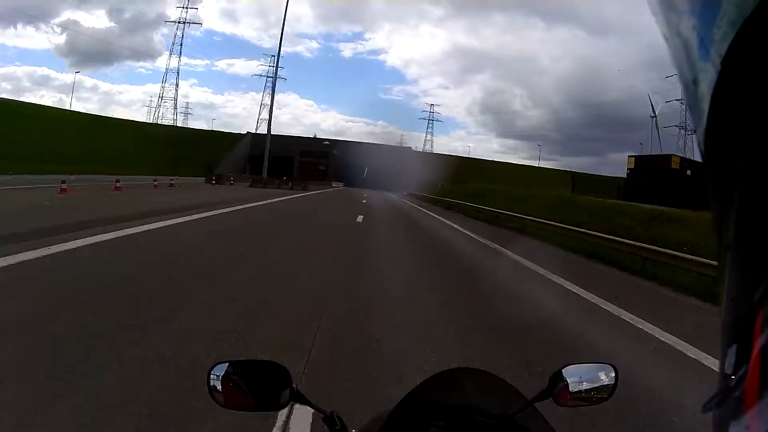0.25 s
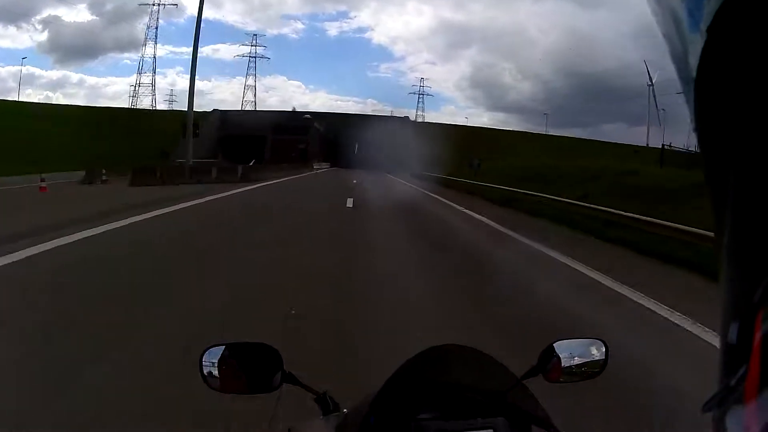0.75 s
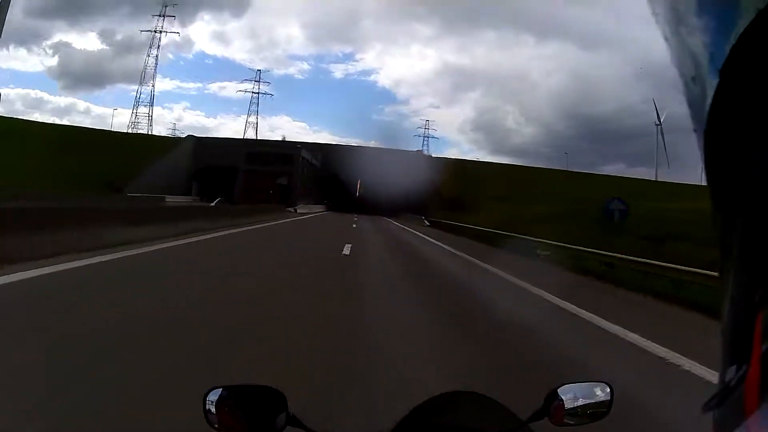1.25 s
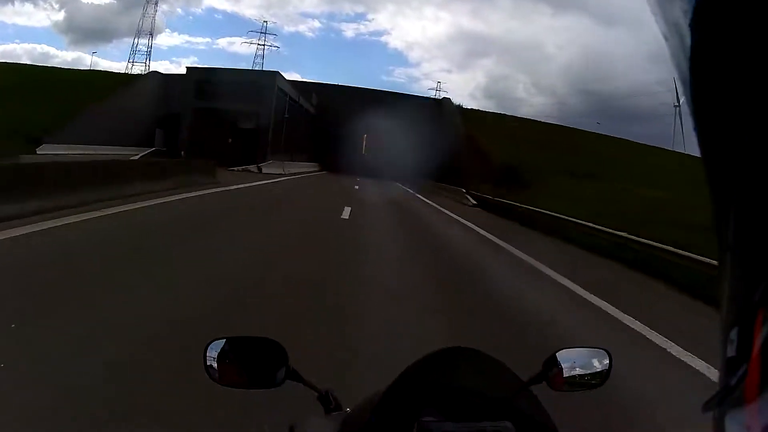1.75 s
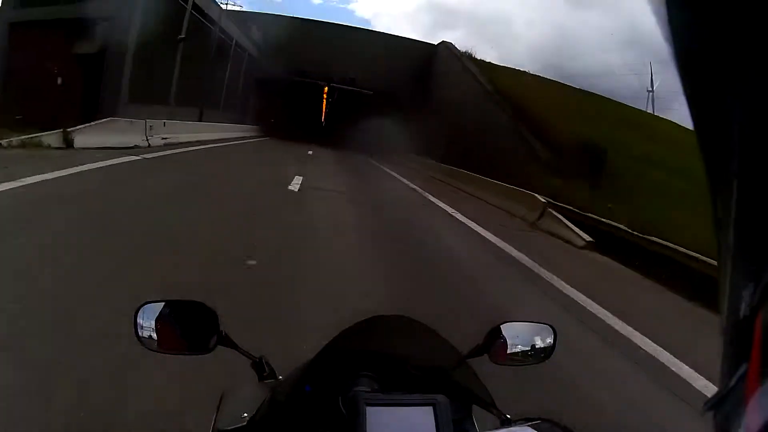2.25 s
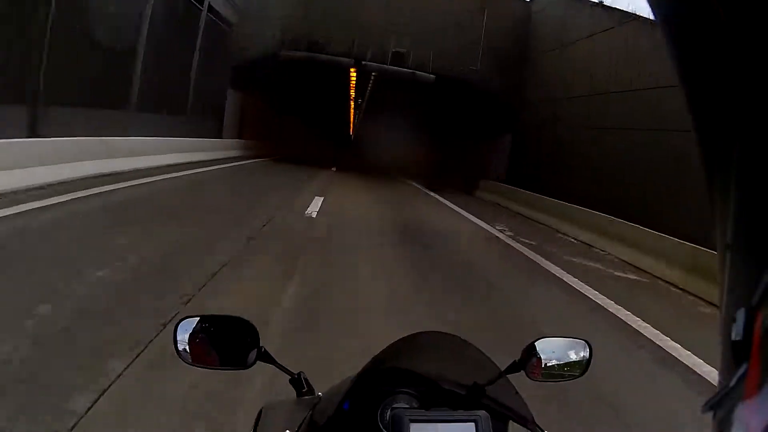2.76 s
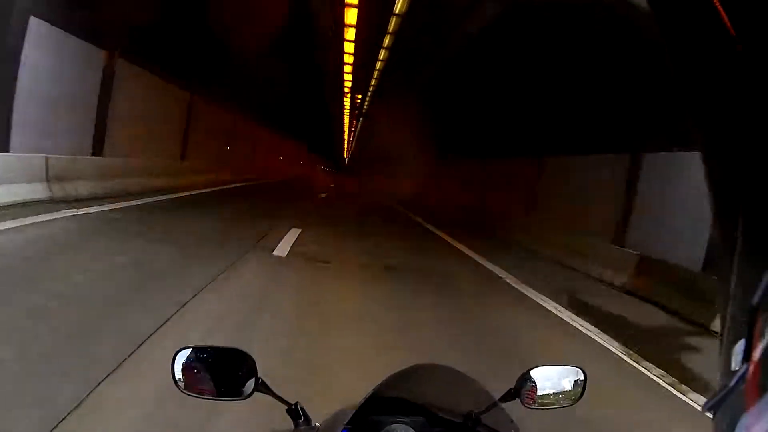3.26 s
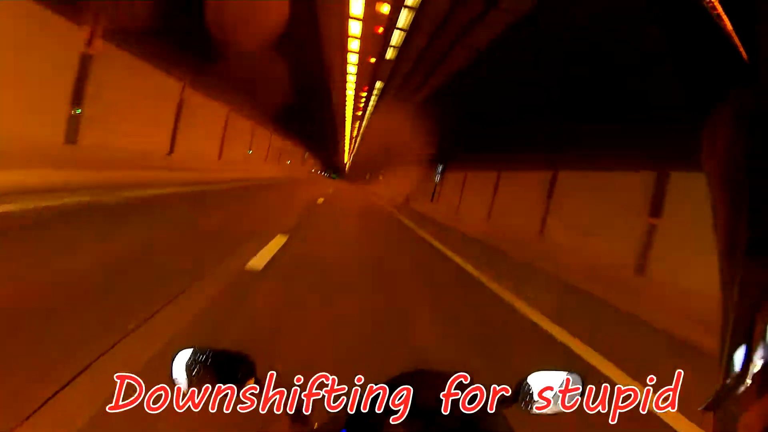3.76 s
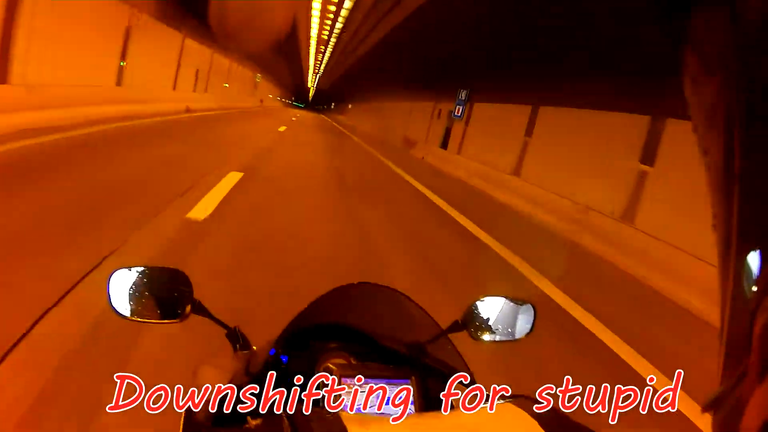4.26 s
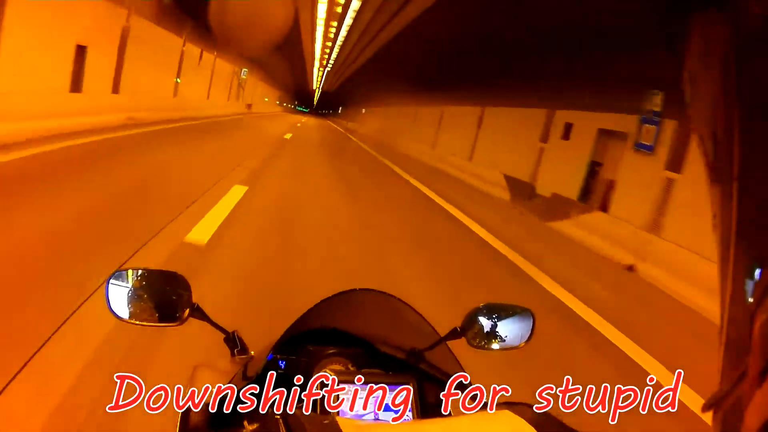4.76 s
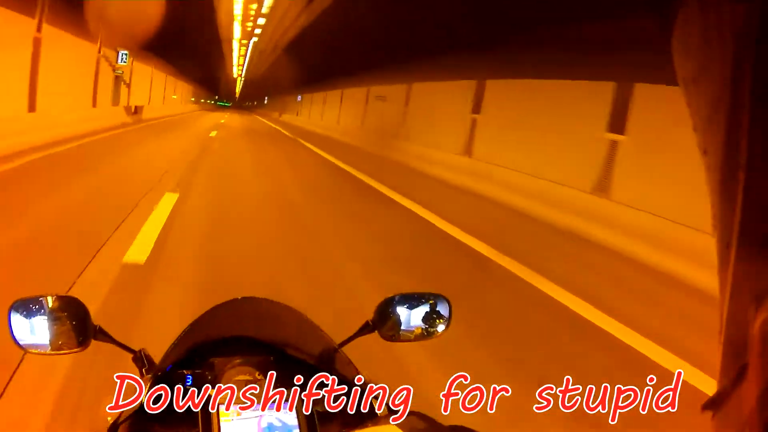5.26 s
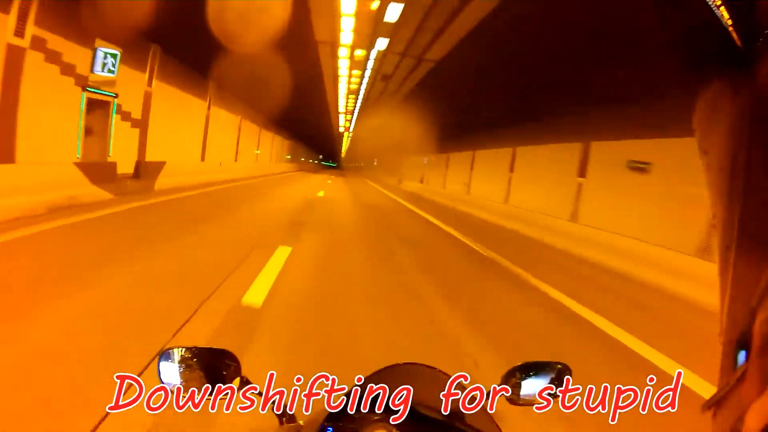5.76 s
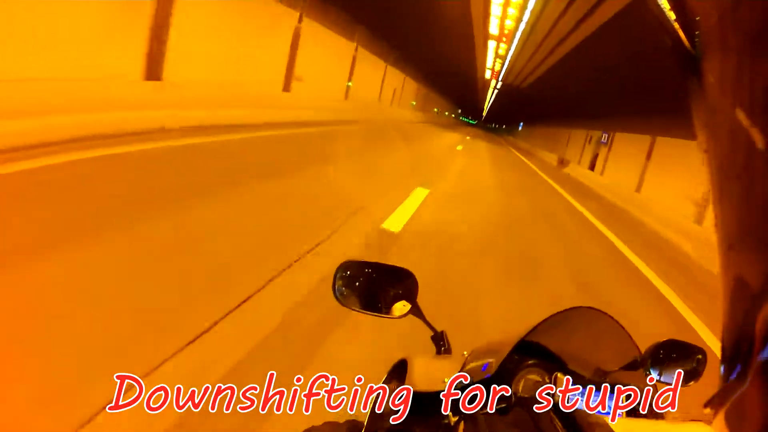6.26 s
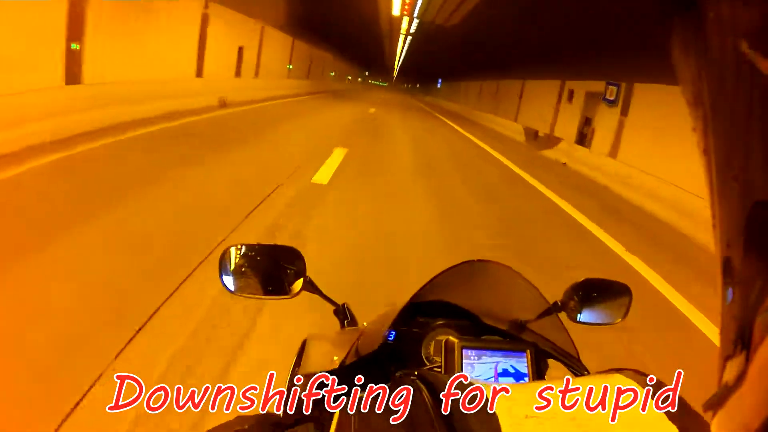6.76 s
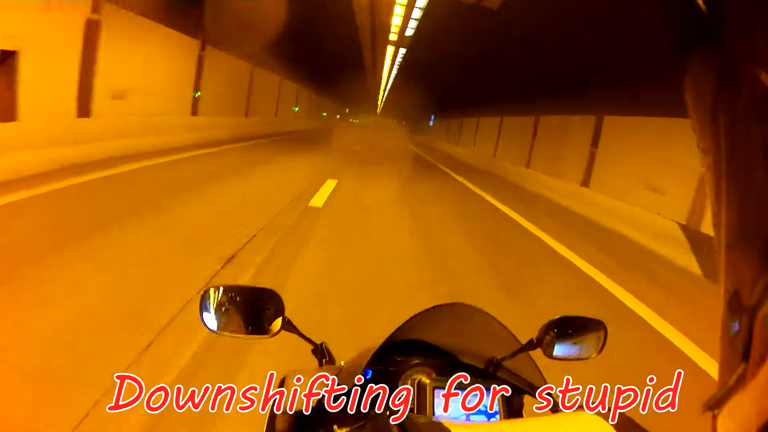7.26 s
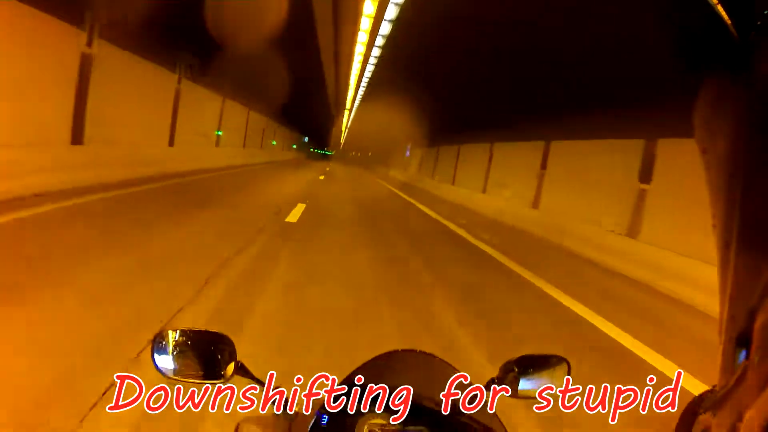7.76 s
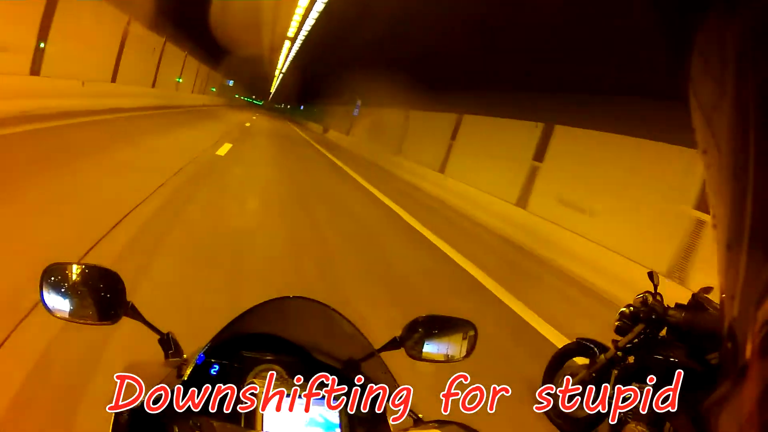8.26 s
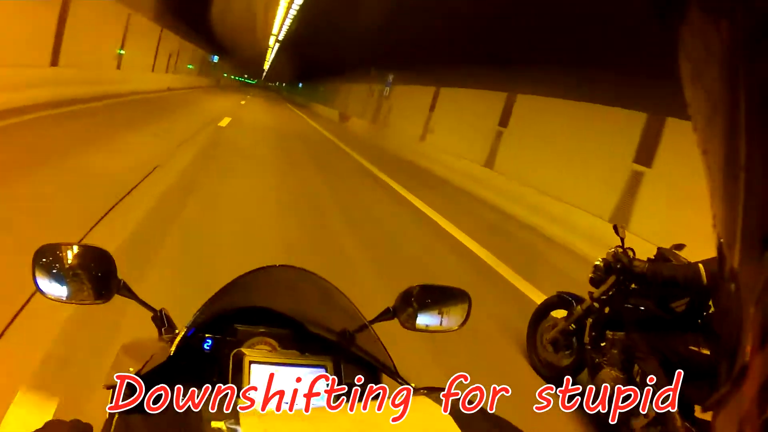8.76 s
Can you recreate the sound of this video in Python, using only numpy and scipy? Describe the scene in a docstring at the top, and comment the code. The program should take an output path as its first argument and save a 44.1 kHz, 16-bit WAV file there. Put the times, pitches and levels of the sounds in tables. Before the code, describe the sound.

From a rider's helmet, heavy gusting wind roars and buffets, stronger in bass on the left, with thumps and dry plastic ticks. Entering a concrete tunnel, the four-cylinder exhaust emerges as a smooth, echoing boom, swelling and fading. It steps higher with a downshift, sags, then steps up again after two short coughs and brief gear whine. A second motorcycle's rough drone draws alongside at the end.

```python
"""A four-cylinder sport motorcycle rides into a road tunnel, heard from the rider's helmet in a roaring airstream.
Its exhaust is a sine at the firing rate with weak overtones and noise puffs; it booms and steps up with two
downshifts, and the pipe coughs twice before the second. Valve clatter and gear whine come from the same bike.
The wind is four bands of gusting noise, with thumps, short flecks of noise and dry ticks of the helmet mount.
A second motorcycle, with its own ragged exhaust note, draws alongside at the end."""
import sys
import numpy as np
from scipy import signal
from scipy.fft import rfft, irfft, next_fast_len
from scipy.io import wavfile
from scipy.ndimage import uniform_filter1d, map_coordinates

SR = 44100
rng = np.random.default_rng(int(sys.argv[2]) if len(sys.argv) > 2 else 0)


def master(y):
    """Save y as 16-bit WAV."""
    cut = np.clip(np.atleast_2d(y).T, -1, 1)
    pcm = np.round(cut * 32767)  # scale
    wavfile.write(sys.argv[1], SR, pcm.astype(np.int16))


N = 397605  # length in samples, about 9 s

# In every table, a positive left-right difference means the left is louder.


def amp(db):
    """Turn decibels into gain."""
    return 10 ** (np.asarray(db) / 20)


def unit(x):
    """Scale to rms 1."""
    return x / np.sqrt(np.mean(x ** 2) + 1e-20)


def along(points, hz):
    """Read a curve of (Hz, value) points on a log frequency axis."""
    f, v = np.transpose(points)
    return np.interp(np.log(hz + 1), np.log(f + 1), v)


def curves(rows):
    """Give one value per sample for each column after the time."""
    s, *cols = np.transpose(rows)
    return [np.interp(np.arange(N) / SR, s, c) for c in cols]


def wobble(rate):
    """Draw a smooth random curve through `rate` random points a second."""
    knots = rng.standard_normal(int(N * rate / SR) + 4)
    return map_coordinates(knots, [np.arange(N) * rate / SR])


def swells(rows):
    """Add up flat-topped swells in dB, one for each (centre, length, dB) row."""
    t = np.arange(N) / SR
    return sum(db * np.exp(-(2 * (t - s) / length) ** 4) for s, length, db in rows)


def bump(centre, half_width):
    """A smooth bell-shaped bump in time; both values in seconds."""
    t = np.arange(N) / SR
    return np.exp(-((t - centre) / half_width) ** 2)


def filtered(x, response):
    """Multiply the spectrum of x by a response of frequency."""
    m = next_fast_len(N + SR // 2)
    return irfft(rfft(x, m) * response(np.fft.rfftfreq(m, 1 / SR)), m)[..., :N]


def panned(side_db):
    """Left and right gains that differ by side_db but keep the power constant."""
    g = amp(np.array([side_db, -side_db]).reshape(2, -1) / 2)
    return g / np.sqrt(np.mean(g ** 2, axis=0))


def colour(points, hz):
    """Gain of a spectrum that falls away steeply beyond its last point."""
    return amp(along(points, hz)) / (1 + (hz / (2 * points[-1][0])) ** 4)


# How alike the wind is at the two ears. Each row: frequency in Hz, likeness from 0 to 1.
ALIKE = [(40, 0.61), (120, 0.63), (175, 0.12), (260, 0.43), (400, 0.28), (630, 0.46), (850, 0.43),
         (1150, 0.74), (1800, 0.79), (2720, 0.87), (5000, .4), (9000, .05)]
# Which ear gets more wind. Each row: frequency in Hz, left-right difference in dB.
WIND_SIDE = [(30, 15.5), (70, 0.5), (140, -3.5), (250, -1.5), (620, -5), (1100, 0), (2000, -1.5),
             (2800, -5), (4000, -3.5), (7000, -6)]
# How far the left ear leads. Each row: frequency in Hz, lead in radians.
WIND_LEAD = [(30, 0.82), (100, 1.32), (260, 1.76), (600, 0.83), (1030, -0.47), (2000, -0.34), (3000, 1.1),
             (6000, -0.15)]


def airflow(spectrum, patchy_db):
    """Turbulent stereo noise of rms 1: patches of random gain in time and pitch, partly alike at the two ears."""
    z = signal.stft(rng.standard_normal((2, N)), nperseg=512)[2]
    field = uniform_filter1d(rng.standard_normal(z.shape[1:]), size=7, axis=0)
    field = uniform_filter1d(field, size=9, axis=1)
    pair = signal.istft(z * amp(patchy_db * unit(field)), nperseg=512)[1][:, :N]

    def mix(hz):
        # more shared "mid" than opposed "side" where the ears are alike
        angle = np.arccos(np.clip(along(ALIKE, hz), -1, 1)) / 2
        return colour(spectrum, hz) * [np.cos(angle), np.sin(angle)]

    def ears(hz):
        lead = np.exp(.5j * np.outer([1, -1], along(WIND_LEAD, hz)))
        return panned(along(WIND_SIDE, hz)) * lead

    mid, side = filtered(pair, mix)
    return unit(filtered(np.array([mid + side, mid - side]), ears))


# How long the tunnel rings. Each row: frequency in Hz, seconds to die away by 60 dB.
TUNNEL = [(100, 1.1), (500, 0.55), (2000, 0.87), (8000, 1.37)]


def tunnel(x):
    """Long concrete echo of decaying noise, renewed every quarter second as the walls fly past."""
    out = np.zeros((2, N + 2 * SR))
    hop = SR // 4
    padded = np.pad(x, (hop, 2 * hop))
    for start in range(0, N + hop, hop):
        hz, t, z = signal.stft(rng.standard_normal((2, SR)), SR, nperseg=256)
        decay = amp(-60 * t / along(TUNNEL, hz)[:, None])
        tail = signal.istft(z * decay, SR, nperseg=256)[1]
        piece = padded[start:start + 2 * hop] * signal.windows.cosine(2 * hop)
        echo = signal.fftconvolve(piece[None], tail / np.linalg.norm(tail[0]), axes=1)
        out[:, start:start + echo.shape[1]] += echo
    return out[:, hop:hop + N]


def crank(firing_hz, jitter):
    """Phase in radians of an engine or gear that turns slightly unevenly."""
    return 2 * np.pi * np.cumsum(firing_hz * (1 + jitter * wobble(70))) / SR


def exhaust(phase, orders, rough_db):
    """Sines at multiples of the basic rate, each fluttering at random in level."""
    out = np.zeros(N)
    for k, db in orders:
        level = amp(db + rough_db * wobble(35))
        out += level * np.sin(k * phase + rng.uniform(0, 2 * np.pi))
    return out


# Throttle and gear changes. Each row: start in seconds, glide in seconds, firing rate reached in Hz.
REV_CHANGES = [(3.199, 0.35, 214.3), (4.58, 0.12, 200.5), (4.77, .15, 232.2), (7.08, .16, 175.9),
               (7.43, .37, 216.3), (7.8, 0.1494, 240.9)]
CRUISE_HZ = 181.4  # firing rate on the open road
SAG_HZ_PER_S = 10  # engine braking after each change


def revs():
    """Firing rate in Hz: each change glides to a new speed, then the engine brakes steadily."""
    t = np.arange(N) / SR
    firing_hz = np.full(N, float(CRUISE_HZ))
    for s, glide, reached_hz in REV_CHANGES:
        coasting = reached_hz - SAG_HZ_PER_S * np.maximum(t - s - glide, 0)
        firing_hz = firing_hz + np.clip((t - s) / glide, 0, 1) * (coasting - firing_hz)
    return firing_hz


# Strength of the airstream, easing and recovering. Each row: time in seconds, strength in dB (scaled per layer).
AIRSTREAM = [(0, 0), (2.6, 0), (3.42, -2), (3.6, -1.5), (4.7, -1), (5.15, -3.5), (5.7, -2), (6.3, -2),
             (6.75, -6), (6.98, -6.5), (7.12, -3.5), (7.7, -3.5), (7.85, -5.5), (8.25, -5), (8.6, -3.5),
             (9.02, -1.5)]
# Gusts strike the left side. Each row: centre in seconds, length in seconds, strength in dB (scaled per layer).
GUSTS = [(.05, 0.049, 4), (.28, 0.059, 1), (.62, 0.04, 0.5), (.86, 0.059, 1), (.97, 0.12, 1),
         (1.9, 0.11, 0.5), (2.3, 0.051, 5.5), (2.7, 0.041, 4.5), (3.2, 0.1, 4), (3.34, 0.095, 1.5),
         (3.65, 0.26, 5), (4.09, 0.056, 2.5), (5.73, 0.12, 2.5), (6.11, 0.057, 1), (7.2, 0.25, 3),
         (8.58, 0.078, 4.5)]
# The left side of the helmet falls into the lee of the screen.
# Each row: centre in seconds, length in seconds, depth in dB (scaled per layer).
LULLS = [(.14, 0.077, 4), (.42, 0.1, 9.5), (.79, 0.057, 5), (1.05, 0.066, 3), (1.38, 0.056, 2.5),
         (1.68, 0.047, 6.5), (2.025, 0.067, 11), (2.57, 0.11, 7.5), (2.78, 0.13, 3.5), (3.07, .11, 7.5),
         (3.27, 0.033, 3), (3.44, 0.11, 11.5), (3.81, 0.089, 3.5), (4.16, 0.038, 3.5), (5.09, 0.063, 9),
         (5.85, 0.053, 4.5), (5.96, 0.054, 2.5), (6.68, 0.022, 8), (6.74, 0.023, 9), (6.97, 0.054, 3.5),
         (7.41, .04, 0.5), (7.8, .11, 17), (8.07, 0.1, 1.5)]
CHOP_DB, CHOPS_PER_S = 0.9, 16  # smaller random gusts on top (dB scaled per layer)
# Basic level of the bass buffeting, before gusts and airstream. Each row: time in seconds, level in dB.
BUFFET_LEVEL = [(0, -20), (2.5, -21.5), (3.2, -22), (4.7, -21), (5.6, -20.5), (6.8, -21), (7.5, -21),
                (8.4, -21.5), (8.75, -26.5), (9.02, -29)]
# The buffeting stalls for a moment; the roar dips less.
# Each row: centre in seconds, length in seconds, depth in dB (negative is a rise).
STALLS = [(.53, .05, 4), (1.77, 0.041, 6), (2.22, 0.074, 6), (2.36, .04, 10), (2.53, 0.029, -1),
          (2.76, .06, 2), (3.33, 0.03, 5)]
# Tone of the four wind layers, from bass to treble. Each row: frequency in Hz, strength in dB.
BUFFET = [(12, -30), (20, -10), (38, -5.5), (135, 0), (173, -4.5), (189, -0.5), (220, -12.5), (290, -34),
          (480, -120)]
ROAR = [(90, -12.5), (140, -7), (180, 0), (230, -1.5), (310, -4), (430, -8.5), (540, -10), (650, -8.5),
        (740, -14), (1000, -19.5), (1400, -31), (2500, -55)]
RUSH = [(600, -12.5), (1000, 2), (1400, 2), (1950, -0.5), (2400, -4.5), (3000, -10.5), (3700, -17),
        (4900, -17.5), (5800, -26), (7500, -32.5), (10000, -43), (14000, -71.5)]
EDGE = [(2000, -35), (3500, 4), (5000, 1.5), (6000, 0.5), (7200, 2), (8600, -4.5), (9800, -5),
        (12500, -11.5), (14000, -23), (15000, -36.5)]
# Basic level in dB, left-right difference in dB, dB gained per dB of airstream
ROAR_DB, ROAR_SIDE_DB, ROAR_GROWS = -19, -2, 1.25
RUSH_DB, RUSH_SIDE_DB, RUSH_GROWS = -31.5, -0.5, 0.95
HISS_DB, HISS_SIDE_DB, HISS_GROWS = -46, 22, 1.53  # air tearing off the visor's left edge
BUFFET_SIDE_DB, BUFFET_GROWS = 5.5, 0.68  # buffeting gains from gusts by the same factor


def wind():
    """One airstream drives buffeting, roar, rush and visor hiss; gusts and lulls reach mainly the left ear."""
    air_db, = curves(AIRSTREAM)
    gust_db = np.outer([1, .12], swells(GUSTS) - swells(LULLS) + CHOP_DB * wobble(CHOPS_PER_S))
    buffet_db, = curves(BUFFET_LEVEL)
    eddies, flutter = wobble(28), wobble(130)  # shared slow and fast unsteadiness
    stall_db = swells(STALLS)

    buffet_db = buffet_db - stall_db + BUFFET_GROWS * (air_db + gust_db) + 1.03 * wobble(22)
    roar_db = ROAR_DB - 0.26 * stall_db + ROAR_GROWS * air_db + 0.89 * gust_db + 0.75 * eddies + .8 * flutter
    rush_db = RUSH_DB + RUSH_GROWS * air_db + 1.13 * gust_db + 0.51 * eddies + 0.56 * flutter
    hiss_db = HISS_DB + HISS_GROWS * air_db + 1.15 * gust_db + 0.59 * eddies + 1.2 * flutter

    buffet = amp(buffet_db) * airflow(BUFFET, patchy_db=-0.37) * panned(BUFFET_SIDE_DB)
    roar = amp(roar_db) * airflow(ROAR, patchy_db=1.0) * panned(ROAR_SIDE_DB)
    rush = amp(rush_db) * airflow(RUSH, patchy_db=0.6) * panned(RUSH_SIDE_DB)
    hiss = amp(hiss_db) * airflow(EDGE, patchy_db=1.4) * panned(HISS_SIDE_DB)
    return buffet + roar + rush + hiss


# Big eddies thump the whole helmet. Each row: centre in seconds, half-width in seconds, level in dB.
THUMPS = [(0.597, .025, -25), (0.835, .02, -21), (1.185, .035, -23), (1.43, 0.05, -20), (1.92, 0.08, -21),
          (2.89, 0.032, -16.5), (3, 0.021, -18), (3.15, .025, -22), (3.241, 0.028, -15), (3.702, .05, -25),
          (8.591, .009, -15.5), (8.97, .025, -22)]
# Tone of the thumps. Each row: frequency in Hz, strength in dB.
THUMP_COLOUR = [(60, -15), (125, -5.5), (175, 4), (230, -3.5), (400, -29)]


def thumps():
    """Short hollow pushes of air against the helmet shell: bursts of low noise."""
    push = sum(amp(db) * bump(s, half_width) for s, half_width, db in THUMPS)
    return push * airflow(THUMP_COLOUR, patchy_db=-1.0)


# Short flecks of mid-range wind noise.
# Each row: centre in seconds, half-width in seconds, level in dB, left-right difference in dB.
FLECKS = [(0.5985, .002, -19, -5), (1.573, .0025, -17.5, -1), (4.088, .0015, -18.5, 8),
          (6.818, 0.0023, -25, 0)]
# Tone of the flecks. Each row: frequency in Hz, strength in dB.
FLECK_COLOUR = [(250, -20), (600, 5), (1000, -3.5), (2000, -19), (4000, -34)]


def flecks():
    """Short random flecks of mid-range wind noise, a few milliseconds long."""
    level = sum(amp(db) * bump(s, half_width) * panned(side_db) for s, half_width, db, side_db in FLECKS)
    return level * airflow(FLECK_COLOUR, patchy_db=5.0)


# The louder mount ticks.
# Each row: start in seconds, level in dB before the tone is shaped, left-right difference in dB.
TICKS = [(.355, -41, 1.5), (1.0075, -41.5, 3), (2.1725, -37.5, 7), (2.502, -33.5, 13.5), (2.7153, -30, 13),
         (3.0043, -33.5, 11), (3.3731, -32, 16), (5.8085, -38.5, 7.5), (5.913, -42, 9), (6.146, -44.5, 9),
         (6.23, -43.5, 6), (6.8921, -45, 10.5), (7.5985, -37, -1.5), (7.732, -40, 10), (7.937, -40.5, 11),
         (8.48, -36.5, 17.5), (8.5185, -43, 6), (8.7349, -32.5, 9), (8.9137, -33.5, 4.5)]
# Tone of the ticks. Each row: frequency in Hz, strength in dB.
TICK_COLOUR = [(2000, -24.5), (4500, 5.5), (8000, 6.5), (11000, 2.5), (14500, -5)]
FAINT_TICKS_PER_S, FAINT_TICK_DB, FAINT_TICK_SPREAD_DB = 3, -49.5, 2  # levels before the tone is shaped


def ticks():
    """Tiny dry snaps of the plastic mount: decaying noise, clear ones among faint ones at random times."""
    out, t = np.zeros((2, N + SR)), np.arange(SR // 20) / SR
    events = list(TICKS)
    for when, size in rng.random((int(FAINT_TICKS_PER_S * N / SR), 2)):
        db = FAINT_TICK_DB + FAINT_TICK_SPREAD_DB * (2 * size - 1)
        events.append((when * N / SR, db, 7))
    for s, db, side_db in events:
        snap = rng.standard_normal(len(t)) * np.exp(-t / 0.00079)  # dies away in about a millisecond
        start = round(s * SR)
        out[:, start:start + len(t)] += amp(db) * snap * panned(side_db)
    return filtered(out[:, :N], lambda hz: colour(TICK_COLOUR, hz))


# The other motorcycle. Each row: time in seconds, firing rate in Hz, level in dB before direct sound and echo mix.
NEIGHBOUR = [(7.3, 322.3, -72.5), (7.85, 319.7, -43), (8.12, 316, -33.5), (8.3, 311.8, -22),
             (8.48, 311.2, -23.5), (8.63, 311.4, -19.5), (8.75, 311, -24), (8.9, 310, -24),
             (9.02, 308.4, -20.5)]
# Its exhaust overtones. Each row: multiple of the firing rate, relative level in dB.
NEIGHBOUR_PIPE = [(0.751, -10), (.875, 2.5), (1, 6), (1.11, -1.5), (1.25, -10), (1.499, -16), (2.12, -9),
                  (2.25, -11), (2.8, -15), (3.4, -18)]


def neighbour():
    """The other motorcycle's ragged note and mechanical rasp, much of it off the walls."""
    firing_hz, level_db = curves(NEIGHBOUR)
    phase = crank(firing_hz, jitter=0.018)
    note = unit(exhaust(phase, NEIGHBOUR_PIPE, rough_db=5.5))
    puffs = (1 + np.cos(phase)) * rng.standard_normal(N)
    rasp_tone = [(150, -35), (330, 12), (430, -1), (550, -6), (660, 1), (780, -2), (950, 2),
                 (1300, 3), (2200, -11.5), (3500, -17.5), (6000, -44.5)]  # Hz, dB
    rasp = unit(filtered(puffs, lambda hz: colour(rasp_tone, hz)))
    pipe = amp(level_db) * (note + amp(-10.0) * rasp)
    return (amp(-1.5) * pipe + amp(-5.5) * tunnel(pipe)) * panned(-2.6)


# The final drive. Each row: time in seconds, tooth rate in Hz, tone level in dB, octave level in dB.
WHINE = [(7.38, 1215, -56, -70), (7.52, 1196, -33, -58), (7.66, 1175, -42, -60), (7.8, 1151, -47, -61),
         (7.95, 1147, -46, -50), (8.22, 1142, -43, -48), (8.4, 1110, -54, -62), (9.02, 1130, -56, -68)]


def whine():
    """Gear teeth sing a tone and its octave that sink, then rise slightly while fading."""
    mesh_hz, tone_db, octave_db = curves(WHINE)
    phase = crank(mesh_hz, jitter=0.009)
    return exhaust(phase, [(1, tone_db), (2, octave_db)], rough_db=4.0) * panned(-2.5)


# Walls closing in, for the clatter and the exhaust echo.
# Each row: time in seconds, echo gain in dB (the clatter takes part of it).
INSIDE = [(0, -10), (2.9, 4.5), (3.7, 3), (9.02, 11)]
# Valve gear: level at that firing rate before the walls add to it, rise with the revs
CLATTER_DB, CLATTER_AT_HZ, CLATTER_DB_PER_HZ = -57.5, 210, 0.0979


def clatter():
    """Valves and chain sizzle once per firing, more on the right, louder with the revs and between the walls."""
    firing_hz = revs()
    walls_db, = curves(INSIDE)
    level_db = CLATTER_DB + CLATTER_DB_PER_HZ * (firing_hz - CLATTER_AT_HZ) + 0.63 * walls_db
    taps = (1 + 0.54 * np.cos(crank(firing_hz, jitter=.006))) * rng.standard_normal(N)
    metal_tone = [(1200, -30.5), (2300, 4.5), (2900, 1.0), (4000, -5.5), (5500, -22.5),
                  (8000, -29.0), (13000, -46.0)]  # Hz, dB
    metal = filtered(taps, lambda hz: colour(metal_tone, hz))
    return amp(level_db) * unit(metal) * panned(-14)


# Exhaust coughs. Each row: centre in seconds, half-width in seconds, level in dB,
# pipe resonance in Hz, bark level in dB relative to the pipe.
COUGHS = [(7.623, 0.013, -21.5, 412, -4), (7.738, 0.008, -27.5, 350, -3.5)]
COUGH_TOP_HZ = 1650  # the silencer swallows the blast above this


def ring(hz, centre, width):
    """Response of a resonance; centre and width in Hz."""
    return 1j * hz * width / (centre ** 2 - hz ** 2 + 1j * hz * width)


def coughs():
    """Unburnt fuel flares in the pipe: hard firings and noise ring a low resonance with a bark above it."""
    out = np.zeros(N)
    firings = np.diff(np.floor(np.cumsum(revs()) / SR), prepend=0)  # one click per firing
    for s, half_width, db, pipe_hz, bark_db in COUGHS:
        blasts = unit(firings) + 1.1 * rng.standard_normal(N)

        def pipe(hz):
            resonances = ring(hz, pipe_hz, 110) + amp(bark_db) * ring(hz, 920, 470)
            return resonances / (1 + (hz / COUGH_TOP_HZ) ** 4)

        out += amp(db) * unit(filtered(blasts, pipe)) * bump(s, half_width)
    return out + amp(-5.5) * tunnel(out)


# The firing note, swelling and fading in the standing waves between the walls.
# Each row: time in seconds, level in dB before trim, fades and flutter, left-right difference in dB.
BOOM = [(0, -42, -5), (3.45, -33.5, 1), (3.62, -22, 2), (3.9, -18, 2), (3.98, -13.5, 2.5), (4.3, -12, -5),
        (4.51, -13.5, -1), (4.62, -15.5, 2.5), (4.78, -17.5, -1), (4.88, -11, 4), (5.04, -10.5, 6),
        (5.2, -14, 13), (5.3, -20, 17), (5.46, -23.5, 7), (5.6, -24, 10), (5.72, -25, 13),
        (5.96, -15.5, 12), (6.1, -14.5, 9), (6.27, -20, 12), (6.42, -19.5, 5), (6.76, -17, -7),
        (6.96, -20, -23), (7.07, -13, -5), (7.14, -28, 1), (7.22, -27, 6.5), (7.5, -25, -6),
        (7.62, -19, -12), (7.72, -20.5, 13), (7.82, -26, 13), (7.88, -14.5, -7), (7.96, -10.5, 1),
        (8.06, -14, -2), (8.15, -12.5, -1), (8.3, -16.5, -7), (8.58, -19, -6), (8.78, -27, -10),
        (9.0, -22, 4)]
# Wall echoes briefly cancel the note. Each row: centre in seconds, length in seconds, depth in dB.
FADES = [(3.86, 0.047, 11), (4.12, 0.041, 10), (4.575, 0.023, 11), (6.16, 0.041, 4.5), (6.49, 0.039, 5),
         (6.7, 0.032, 6), (6.99, 0.042, 6), (7.79, .07, 6), (8.022, 0.047, 14), (8.19, 0.033, 7)]
# How much the note breaks up. Each row: time in seconds, flutter in dB.
FLUTTER = [(3.5, 3), (4.2, 2.5), (5.1, 2), (5.5, 2.5), (6.5, 2), (6.8, 1.8), (7.07, 2), (7.3, 3.5),
           (7.7, 3.5), (7.9, 1.5), (8.22, 1.2), (8.45, 4), (9.02, 5)]
# Level of the overtones and gas noise together. Each row: time in seconds, gain in dB.
THROTTLE = [(0, -37), (3.4, -42.5), (4.2, -40), (5.1, -37.5), (5.6, -41), (6.8, -38.5), (7.22, -39),
            (7.38, -33.5), (7.62, -36.5), (7.8, -41.5), (8.1, -41), (8.4, -32.5), (9.02, -37)]
# Exhaust overtones. Each row: multiple of the firing rate, relative level in dB.
PIPE = [(.5, -3.5), (1.5, -5.5), (2, 0), (2.5, -18.5), (3, -5), (4, -14.5), (5, -15), (6, -17.5),
        (7, -13.5)]
BOOM_SKEW_RAD = -0.3  # phase shift of the note at the left ear, opposite at the right
FLUTTER_RAD_PER_DB = 0.14  # phase unsteadiness that comes with the flutter


def motorcycle():
    """A booming firing note with weak overtones and a puff of gas noise at each firing."""
    boom_db, side_db = curves(BOOM)
    throttle_db, = curves(THROTTLE)
    echo_db, = curves(INSIDE)
    flutter_db, = curves(FLUTTER)
    phase = crank(revs(), jitter=0.0062)

    puffs = (1 + np.cos(phase)) ** 2 * rng.standard_normal(N)
    rasp_tone = [(200, -16.0), (600, -5.0), (2200, -5), (5000, -32.0)]  # Hz, dB
    rasp = unit(filtered(puffs, lambda hz: colour(rasp_tone, hz)))
    overtones = amp(throttle_db) * (exhaust(phase, PIPE, rough_db=3) + amp(-11.0) * rasp)

    # wall reflections shift the note's phase from one ear to the other
    skew = BOOM_SKEW_RAD * np.array([[1], [-1]])
    note = np.sin(phase + skew + FLUTTER_RAD_PER_DB * flutter_db * wobble(45))
    ear_flutter_db = flutter_db * np.array([wobble(50), wobble(50)])  # separate at each ear
    note_db = boom_db - 0.47 - swells(FADES) + 0.9 * wobble(20) + ear_flutter_db
    boom = amp(note_db) * note * panned(side_db)

    echo = tunnel(amp(echo_db) * (amp(-16) * boom.mean(axis=0) + amp(-4.0) * overtones))
    return boom + overtones * panned(0.93) + echo


def scene():
    """Everything that reaches the helmet."""
    air = wind() + thumps() + flecks() + ticks()
    return air + neighbour() + whine() + clatter() + coughs() + motorcycle()


TOP_HZ = 14800  # upper band limit


def record(dry):
    """Keep nothing above the band limit."""
    return filtered(dry, lambda hz: hz < TOP_HZ)


dry = scene()
out = record(dry)
master(out)
```